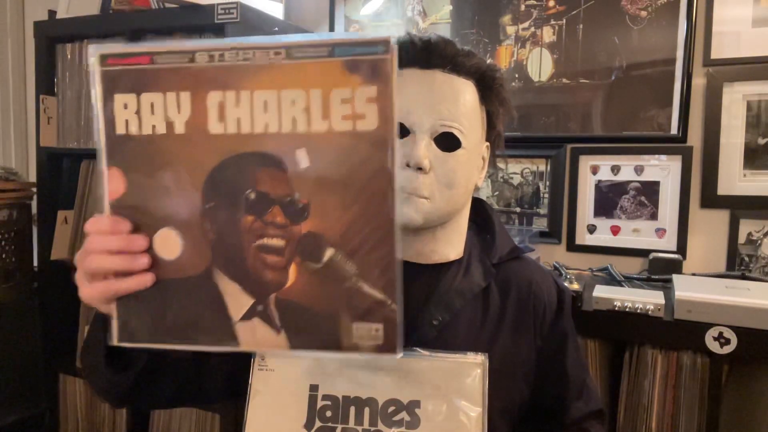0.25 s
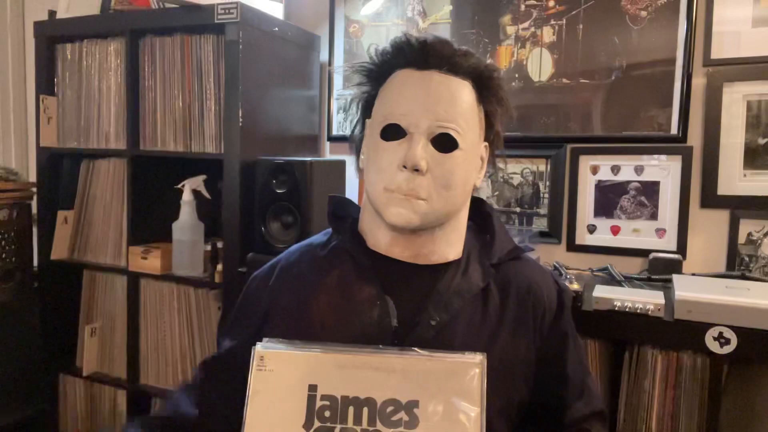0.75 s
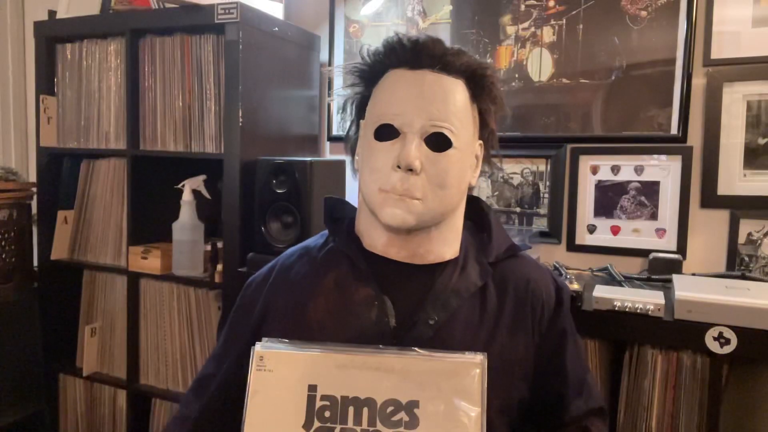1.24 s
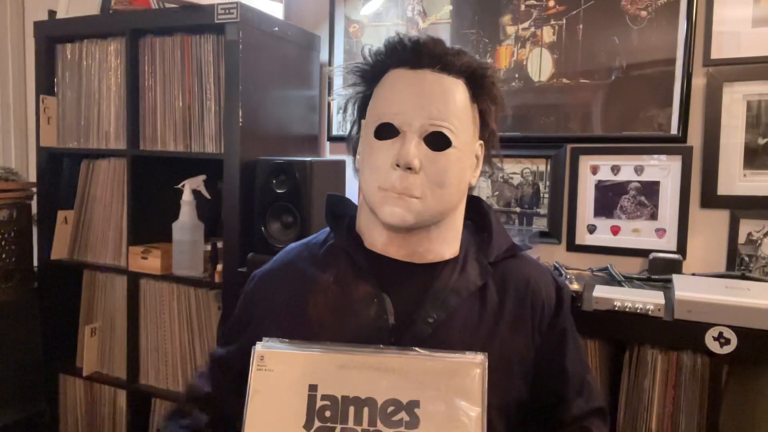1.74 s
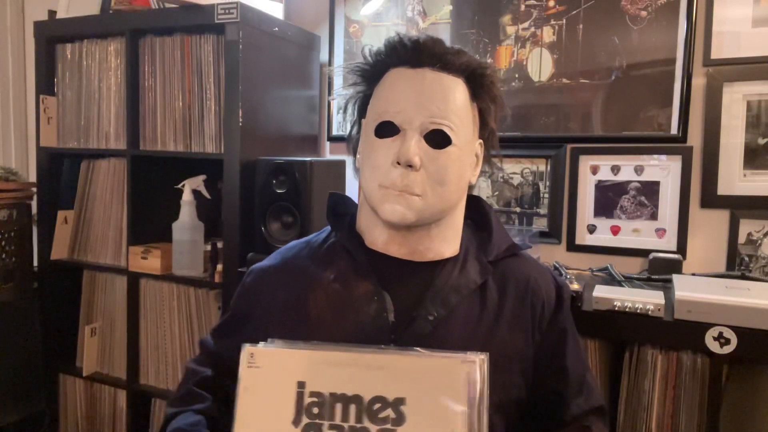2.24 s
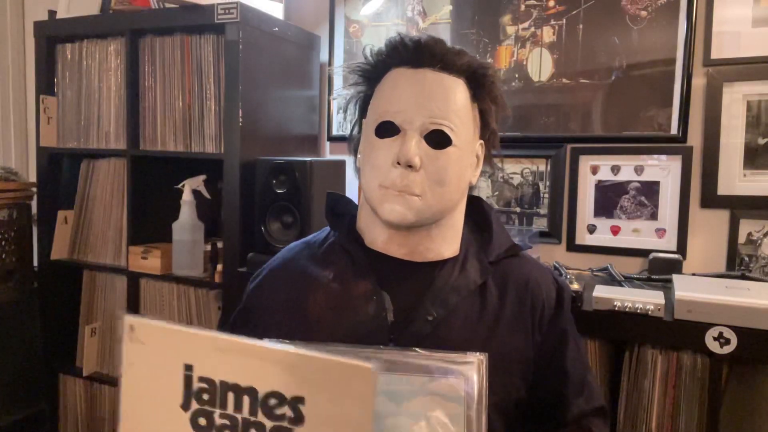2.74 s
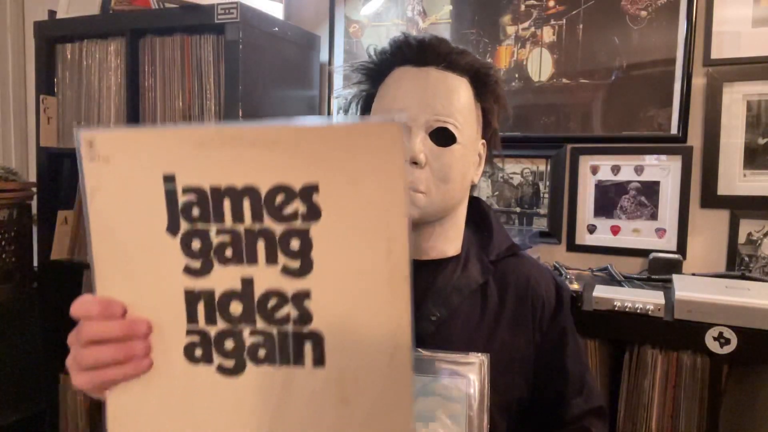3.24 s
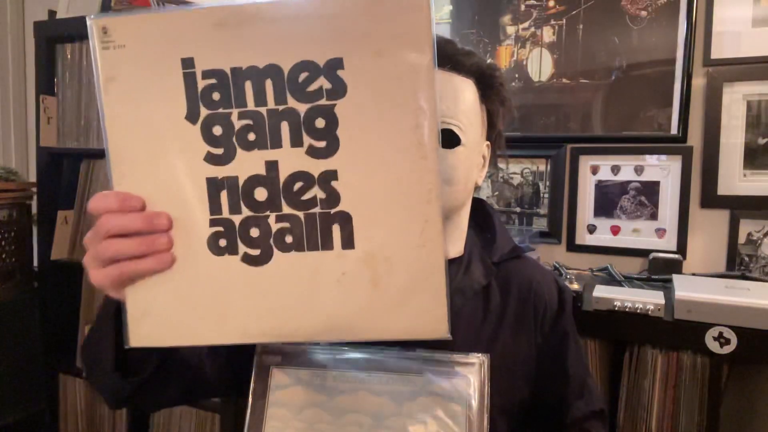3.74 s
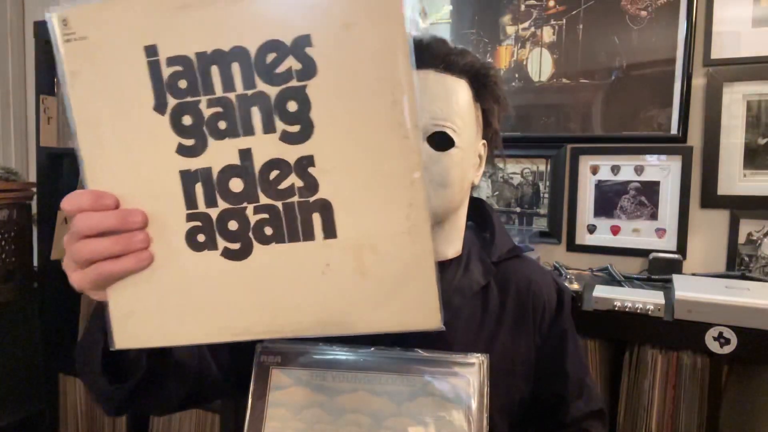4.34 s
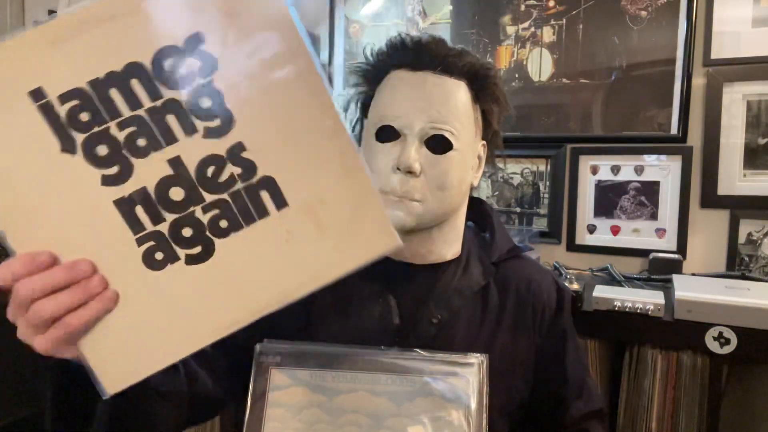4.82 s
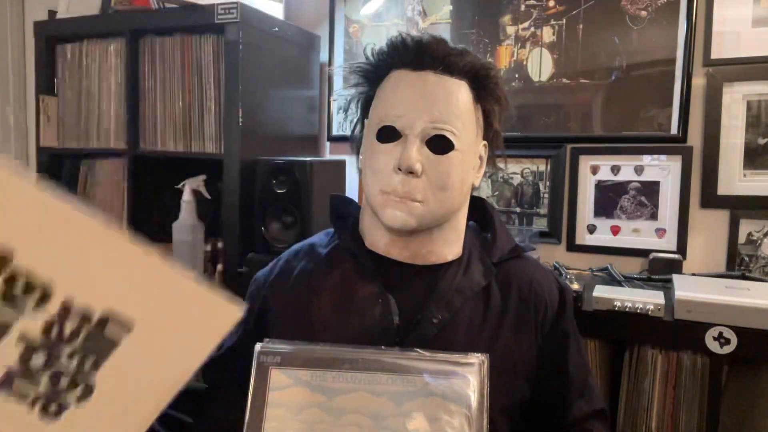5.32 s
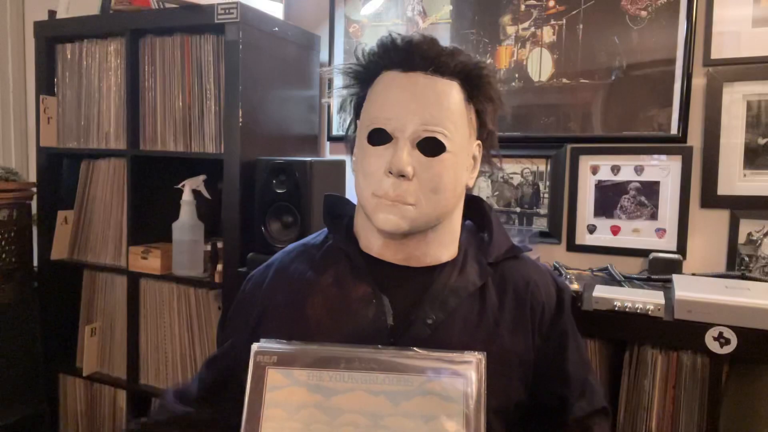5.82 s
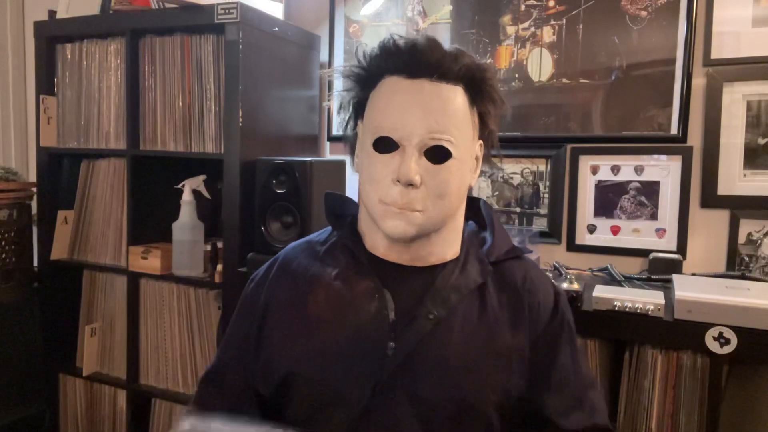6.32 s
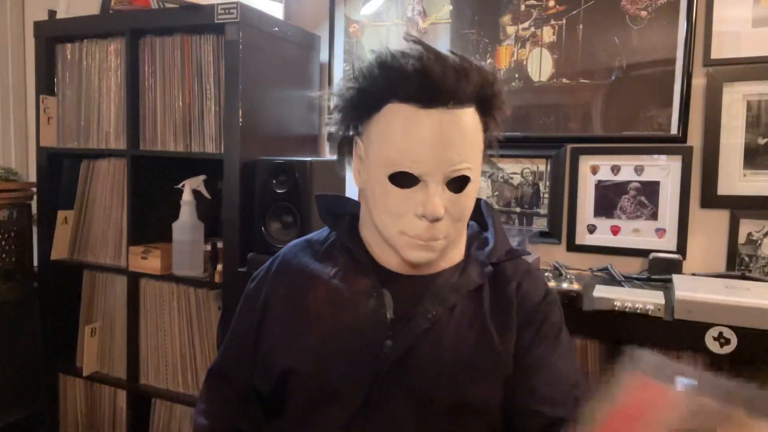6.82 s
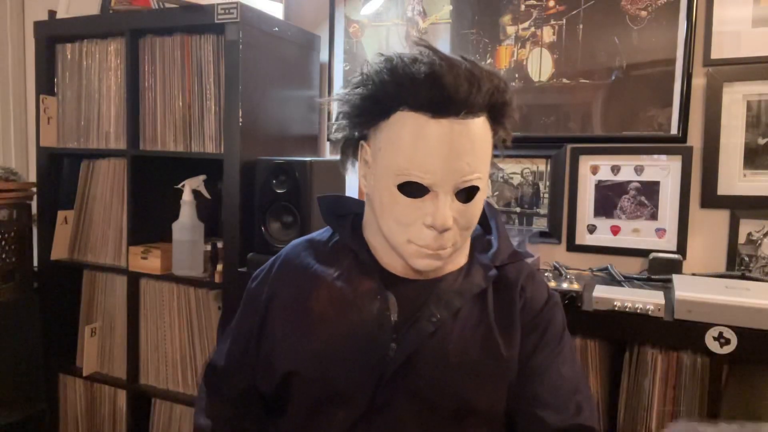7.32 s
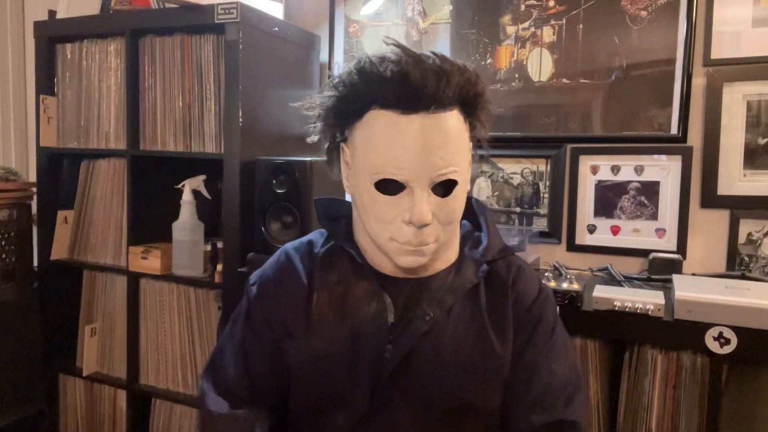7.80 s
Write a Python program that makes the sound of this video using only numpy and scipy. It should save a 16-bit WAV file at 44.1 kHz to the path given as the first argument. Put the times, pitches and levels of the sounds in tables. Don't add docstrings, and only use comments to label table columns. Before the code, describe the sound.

Close up in a small furnished room, hands move card record covers in plastic sleeves. A few faint ticks and a short crinkle come first, then a hard flat slap. Rustling, tiny squeaks and a sharp snap follow, then near quiet with light taps. Later the film crinkles again, a second slap lands, and busy rustling continues over a steady low hum.

```python
import sys
import numpy as np
from scipy import signal
from scipy.fft import rfft, irfft, next_fast_len
from scipy.io import wavfile

SR = 44100
rng = np.random.default_rng(int(sys.argv[2]) if len(sys.argv) > 2 else 0)


def voltage_ratio(decibels):
    exponent = np.asarray(decibels, float) / 20
    return 10 ** exponent


def to_wav(sig):
    pcm = np.clip(np.atleast_2d(sig), -1, 1) * 32767
    pcm = np.round(pcm).astype(np.int16)
    wavfile.write(sys.argv[1], SR, pcm.T)


N = 355446

# start in seconds, film level in dB,
# middle in dB above the film, card in dB above the film, decay time t60 in seconds.
COVER_LANDINGS = [(1.5633, -47, 10, 24, 0.027), (1.5668, -45, 15.5, 26, 0.02), (1.575, -33, 4.5, 10, 0.066),
                  (1.581, -6, -6, -2, 0.016), (1.583, -3, -4, -17, 0.014), (1.587, -20, 9, 12, 0.0076),
                  (1.589, -20.5, -2.5, 3, 0.039), (6.206, -33, 0.5, 20, 0.026),
                  (6.213, -32.5, 9, 17.5, 0.04), (6.233, -28, 9.5, 23, 0.014), (6.237, -6, -7, -9, 0.011),
                  (6.2395, -22.5, 9, 6, 0.052), (6.243, -21.5, 2.5, 6.5, 0.012)]
# frequency in Hz, width in Hz, level in dB.
PILE_MODES = [(180.2, 65, 3), (255, 120, 2.5), (350, 120, 2), (758.3, 130, -1), (1000, 300, -7),
              (1350, 140, -1.5), (1650, 360, -1.5), (2050, 500, -9)]
# frequency in Hz, width in Hz, level in dB.
HIGHER_PILE_MODES = [(94.1, 60, -1.5), (266, 90, 3), (418, 85, 0), (541.7, 70.4, -2), (776, 110, -0.5),
                     (1100, 164, -0.5), (1350, 150, -4), (1990, 270, -3)]
# start in seconds, peak in dB, fold pitch in Hz,
# left over right in dB.
TICKS = [(0.6275, -60, 1310, -2), (1.198, -39.5, 1840, 3), (1.2043, -43.5, 3080, -12),
         (1.3635, -38, 1350, 8), (1.374, -35.5, 3870, -13), (2.1808, -45, 2630, 3),
         (2.4666, -24.5, 2380, -3), (2.475, -40, 4000, 3), (2.7328, -68, 1230, -3.5),
         (2.7936, -55, 2150, 10.5), (3.1984, -60.5, 2140, -5), (3.372, -57, 5100, -5),
         (4.755, -60.5, 3760, 4), (5.7543, -49, 2750, -0.5), (5.7732, -40, 2160, -4.5),
         (6.1264, -38.5, 1340, 9), (6.304, -39.5, 3964, 3), (6.453, -55, 2390, 9.5),
         (6.5364, -43.5, 4760, -10), (6.542, -38.5, 1683, 8), (6.554, -36.5, 1330, -10.5),
         (6.612, -50, 4410, 11), (6.694, -42, 1590, 4), (6.785, -56, 4865, -10), (6.798, -41, 4900, 8),
         (6.8617, -47, 4690, 8), (7.8514, -53, 3187, 2), (7.888, -43.5, 1650, 8), (7.9983, -31, 4760, -0.5)]
# start in seconds, peak in dB, knock in dB more, fold pitch in Hz.
KNOCKS = [(0.6632, -49, 8.5, 6900), (1.1344, -65, 10, 1256), (2.1056, -61, 17, 1960),
          (2.1145, -30.5, 4, 1970), (2.2313, -46, 4, 2480), (2.3938, -58.5, 18.5, 2016),
          (2.4577, -53, 3.5, 2600), (2.7164, -61.5, 6, 2427), (3.441, -60, 11, 4541),
          (4.3994, -70, 20.5, 1882), (4.8307, -58.5, 18.5, 4030), (5.3654, -61.5, 8, 5460),
          (5.812, -43, -3.5, 3070), (5.8628, -42, -3.5, 2450), (5.9274, -58, -8, 1210),
          (6.4144, -49.5, -4, 1256), (6.4653, -72, 13.5, 2549), (6.5643, -41, 3.5, 1920),
          (6.688, -42, 7.5, 1160), (6.7429, -39.5, 4, 1430), (6.8452, -43, 1.5, 1824),
          (6.8805, -46, 4, 3890), (7.1514, -84.5, 20, 4120), (7.208, -77, 15.5, 3786),
          (7.226, -74, 24.5, 1410), (7.3114, -73.5, 20, 2356), (7.7025, -57.5, 8.5, 3034),
          (7.878, -47.5, 4, 1686), (7.9902, -46.5, 8, 4550)]
# start in seconds, peak in dB, knock in dB more,
# fold pitch in Hz.
TAPS = [(1.8208, -46.5, 2, 1403), (2.383, -53, 0.5, 2785), (2.5475, -58, 10, 2200), (2.7455, -80, 22, 2040),
        (2.8033, -58, 4, 2083), (2.8893, -65, 19, 2450), (2.9734, -49, 7, 2200), (4.867, -75, 7.5, 1712),
        (4.9754, -69, 18, 2297), (5.389, -63, 2.5, 2130), (6.6634, -46, -1, 4590),
        (7.9369, -54, -1.5, 1631)]
# start in seconds, peak in dB, knock in dB more,
# fold pitch in Hz.
FLICKS = [(0.663, -66, 16, 1500), (0.6687, -67, 3, 6400), (1.3668, -39.5, 0, 6100), (1.8165, -70, 14, 897),
          (6.4, -62, 0.5, 1500), (6.464, -55.5, 5, 4500), (6.569, -46, 0, 4004), (6.8, -50, 1, 4590),
          (7.196, -82, 20, 3800), (7.24, -77, -6, 3000), (7.505, -69.5, 10, 1000), (2.122, -41, -15, 2600),
          (2.607, -71, 12, 2200), (2.649, -65, 13, 1490), (4.8375, -72, 10, 2500), (4.842, -70, 1, 5200),
          (4.865, -80.5, 20, 1725), (4.877, -80, 3, 1500), (4.893, -78, 8, 1600), (5.79, -66, 7.5, 2000),
          (5.872, -58.5, 5.5, 3100), (5.914, -67, 8, 2094), (5.938, -58, 10, 3570),
          (5.954, -61.5, 20.5, 1100), (6.1304, -39, -7.5, 1880), (6.137, -46, -8.5, 6426),
          (7.7068, -58, 10, 3036), (7.872, -56, -5, 2980), (7.98, -45, -2, 2500), (8.002, -37, -3, 3000),
          (8.005, -44, 0, 4900), (8.057, -49, 6, 3980), (0.663, -64, 18, 6500), (0.663, -65, 17, 4940),
          (5.366, -80, 13, 5700), (4.832, -66, 17, 1500), (6.688, -59, 15, 1110), (6.664, -48, 7, 4380),
          (2.386, -46, -8, 3000), (2.793, -66, 13.5, 1600), (5.95, -68, 2, 1500)]
# start in seconds, peak in dB, knock in dB
# more, fold pitch in Hz.
SPECKS = [(6.454, -70, 11, 2500), (6.486, -77, 16, 1500), (2.986, -77, 12, 6400), (2.926, -75, -6, 6500),
          (4.749, -72, -10, 5000), (4.982, -72, -8, 3000), (2.7225, -78, 12, 1200), (2.511, -70, 14, 3900),
          (2.5895, -74, 14, 2200), (6.655, -66, 15, 4400), (5.838, -70, 14, 2600), (2.317, -68, 14, 3200),
          (2.111, -58, 14, 1500), (1.118, -82, 14, 1500), (4.942, -84, 14, 1700), (7.155, -82, 18, 2200),
          (7.272, -86, 15, 3300), (7.49, -84, 16, 1100), (7.517, -84, 16, 1100), (7.541, -85, 15, 1900),
          (7.938, -72, 10, 4500), (6.687, -56, 17, 1000), (5.8125, -64, 16, 4200), (5.935, -70, 16, 1700)]
# frequency in Hz, density in dB per Hz.
FILM_COLOUR = [(120, -51.5), (200, 5), (411, -3.5), (640, -8.5), (702, -8.5), (1220, -7.5), (1550, -3),
               (2560, -2), (6430, -7), (7320, -8), (11000, -8), (14500, -12), (15600, -18), (16600, -35)]
# start in seconds, length in seconds, rasp level in dB,
# sheen in dB more.
SCUFFS = [
    (0.668, .075, -66, -12),
    (1.138, .045, -68, -14),
    (1.366, .2, -61, 3),
    (1.816, .06, -55, -3),
    (2.478, .07, -64, 4),
    (4.836, .08, -68.5, -12),
    (5.812, .04, -61, 4),
    (6.79, .03, -61, 6),
    (7.152, .12, -77, -18),
]
# start, fullest point and end in seconds, rasp level in dB, sheen in dB more.
SLIDES = [(1.19, 1.21, 1.24, -63, 0), (1.25, 1.285, 1.303, -66.5, 1), (1.29, 1.34, 1.35, -63.5, 2.5),
          (1.38, 1.41, 1.26, -88, 0), (1.86, 1.9, 1.94, -76, -1), (1.965, 1.988, 2.003, -68.5, 11),
          (2.04, 2.09, 2.07, -80.5, 4), (2.12, 2.26, 2.36, -62, 6), (2.3, 2.38, 2.486, -62.5, 6),
          (2.5, 2.57, 2.66, -68, 6.5), (5.735, 5.75, 5.84, -74, 8.5), (5.77, 5.8, 5.7, -66, 0),
          (5.84, 5.88, 5.93, -69.5, 1), (5.88, 5.96, 5.95, -63, 3), (5.96, 6.03, 6.04, -69, 5.5),
          (6.04, 6.1, 6.2, -71.5, 1), (6.122, 6.135, 6.185, -63, 9), (6.15, 6.195, 6.3, -62, -12),
          (6.33, 6.4, 6.6, -78, -7), (6.55, 6.6, 6.84, -68, -3), (6.61, 6.655, 6.7, -63, -3),
          (6.66, 6.72, 6.79, -61, -5), (6.81, 6.878, 6.905, -63, -7), (7.26, 7.365, 7.392, -73, 0),
          (7.47, 7.59, 7.72, -77, 3), (7.692, 7.705, 7.76, -62.5, -2), (7.73, 7.785, 7.8, -60.5, 1),
          (7.83, 7.885, 7.87, -63, -3), (7.92, 7.998, 8.03, -57, -5.5), (8.025, 8.058, 8.3, -57, 0.5)]
# start, fullest point and end in seconds, card body level in dB,
# low drag in dB more.
DRAGS = [(1.19, 1.21, 1.28, -72, -27), (1.37, 1.41, 1.56, -76, 20), (1.825, 1.832, 1.896, -66.5, -1),
         (1.95, 1.984, 2.03, -76, -7.5), (2.17, 2.255, 2.38, -68.5, -8), (2.375, 2.391, 2.1, -68, -5),
         (2.47, 2.48, 2.45, -75, 6), (2.53, 2.56, 2.74, -85, 6), (4.832, 4.836, 4.96, -72, -29),
         (5.78, 5.818, 5.83, -60.5, -3.5), (5.87, 5.94, 6.1, -66, -3.5), (6.08, 6.125, 6.17, -67, 2),
         (6.34, 6.394, 6.547, -73, -14), (6.55, 6.58, 6.85, -69, 0), (6.62, 6.7, 6.79, -58, -20),
         (6.82, 6.88, 6.93, -71, -3), (7.14, 7.2, 7.27, -74, -20), (7.3, 7.366, 7.43, -76, -9),
         (7.47, 7.51, 7.62, -75, -20), (7.7, 7.76, 7.84, -67, -21.5), (7.92, 7.97, 8.15, -68, -18)]
# start in seconds, length in seconds, first pitch in Hz,
# last pitch in Hz, level in dB.
SQUEAKS = [
    (2.231, .013, 2300, 2750, -53),
    (2.279, .011, 3700, 3750, -60),
    (2.36, .011, 4400, 4250, -57),
    (2.358, .03, 3100, 2400, -62),
    (6.562, .013, 1900, 1850, -49),
]
# start and end in seconds, pitch in Hz, width in Hz,
# level in dB.
STRIPS = [(1.364, 1.5, 218, 60, -61), (2.12, 2.171, 2430, 500, -64.5), (2.465, 2.528, 11300, 900, -60.5),
          (5.783, 5.849, 4238, 900, -66), (6.02, 6.125, 2150, 350, -72), (7.696, 7.721, 2915, 500, -61.5),
          (7.732, 7.772, 2200, 500.7, -60), (7.78, 7.847, 2660, 350, -64), (8.003, 8.024, 4770, 500, -68),
          (1.818, 1.877, 6420, 703, -70), (1.124, 1.175, 6200, 900, -73), (6.625, 6.669, 4390, 900, -58),
          (7.15, 7.257, 3600, 1507, -81)]
# frequency in Hz, phase in radians.
PILE_PORTS = [(0, 0), (1900, 1.4), (3000, 2.0), (3700, 4.5), (6400, 4.4), (7700, 3.8), (11200, 6.0),
              (14200, 6.8), (16000, 8.6)]
# frequency in Hz, phase in radians.
HAND_PORTS = [(0, 0), (2500, -.6), (4500, -1.6), (6600, -2.1), (7600, -2.9), (11200, -.1), (14200, .1),
              (16000, 2.4)]
# frequency in Hz, decay time t60 in seconds.
ROOM_DECAY = [(200, .19), (1000, .18), (4000, .19), (12000, .15)]
# frequency in Hz, level in dB, left over right in dB.
HUM_LINES = [(21.5, -67, -1.8), (69, -59, -0.74), (119.6, -63, -1.5), (242, -77.5, -7), (360.4, -80, -6),
             (484, -89.5, -3.5), (596, -88, -4)]
# frequency in Hz, width in Hz, level in dB.
RUMBLE_BANDS = [(70, 9, -68), (120, 12, -70)]
# frequency in Hz, density in dB per Hz.
AIR_COLOUR = [(25, -30), (42, -8), (71, -4), (129, -6), (170, -14), (310, -25), (540, -34.5), (1200, -47.5),
              (4280, -52), (7230, -57), (13600, -56), (16500, -79)]
# frequency in Hz, likeness from -1 to 1.
AIR_LIKENESS = [(60, 1), (130, -0.39), (250, 0.19), (500, .1), (2000, 1), (7000, -0.47), (10000, 0.41),
                (14000, 0.28)]

SECOND_COVER_S = 4
EASE_DB, EASE_BEND = 12.5, 1.4


def rms_one(x):
    return x / np.sqrt(np.mean(x ** 2) + 1e-20)


def at_hz(points, hz):
    table_hz, values = np.transpose(points)
    return np.interp(np.log(np.maximum(hz, 1)), np.log(table_hz), values)


def coloured(x, gain_of_hz):
    size = next_fast_len(x.shape[-1] + 4096)
    hz = np.arange(size // 2 + 1) * SR / size
    return irfft(rfft(x, size) * gain_of_hz(hz), size)[..., :x.shape[-1]]


def band(x, low_hz, high_hz):
    edges = [low_hz, min(high_hz, .45 * SR)]
    return signal.sosfilt(signal.butter(2, edges, "band", fs=SR, output="sos"), x)


def resonance(x, hz, width_hz):
    r = np.exp(-np.pi * width_hz / SR)
    feedback = [1, -2 * r * np.cos(2 * np.pi * hz / SR), r * r]
    return signal.lfilter(np.array([1, 0, -1]) * (1 - r * r) / 2, feedback, x)


def drift(rate):
    knots = rng.standard_normal(int(N / SR * 200) + 2)
    return np.interp(np.arange(N) / SR * min(rate, 199), np.arange(len(knots)), knots)


def panned(x, db):
    return np.array([x * voltage_ratio(db / 2), x * voltage_ratio(-db / 2)])


def puff(noise, t60, tick_share):
    t = np.arange(len(noise)) / SR
    decay = voltage_ratio(-60 * t / max(t60, .002))
    tick = np.arange(len(t)) == 14
    return noise * decay * np.minimum(t / 0.00033, 1) + tick_share * tick


def slaps(tick_share):
    blows = np.zeros((4, N))
    noise = rng.standard_normal((len(COVER_LANDINGS), 4, 8192))
    for (s, peak_db, mid_db, card_db, t60), draws in zip(COVER_LANDINGS, noise):
        at = round(s * SR)
        push_db = (-3 if s > SECOND_COVER_S else -11) + 0.21 * card_db
        parts = ((0, 1), (mid_db, 1.3), (card_db, 1.6), (push_db, 2.5))   # dB, times longer
        for k, (db, lasts) in enumerate(parts):
            blows[k, at:at + draws.shape[1]] += voltage_ratio(peak_db + db) * puff(draws[k], lasts * t60, tick_share)
    film = band(blows[0], 6000, 13000) + voltage_ratio(2) * band(blows[1], 900, 6000)
    card = []
    for hits, modes in zip(np.split(blows[2], [SECOND_COVER_S * SR]), (PILE_MODES, HIGHER_PILE_MODES)):
        card.append(sum((-1) ** k * voltage_ratio(db) * resonance(hits, hz, width)
                        for k, (hz, width, db) in enumerate(modes)))
    card = np.concatenate(card)
    air_push = band(blows[3], 64, 300)
    wide = sum(voltage_ratio(db) * resonance(blows[3], hz, width) for hz, width, db in PILE_MODES[1:5])
    centre = film + voltage_ratio(8.5) * card + voltage_ratio(13) * air_push
    return panned(centre, -0.99) + voltage_ratio(5) * wide * [[1], [-1]]


def snaps(rows):
    t60, tick_share = 0.0043, 0.93
    out = np.zeros((2, N))
    noise = rng.standard_normal((len(rows), 3, 2048))
    for (s, peak_db, mid_db, hz, low_db, pan_db), (bright, middle, dull) in zip(rows, noise):
        top_hz = np.clip(12134 - 221.5 * mid_db, 7000, 16000)
        tick = band(puff(bright, t60, tick_share), 6400, top_hz)
        middle = puff(middle, 3.5 * t60, tick_share)
        pitched = resonance(middle, hz, hz / 4.5)
        unpitched = 0.29 * voltage_ratio(-0.4 * max(mid_db, 0)) * band(middle, 820, np.clip(2.4 * hz, 3600, 9200))
        knock = band(pitched + unpitched, 600, 11000)
        push = band(puff(dull, 9.8 * t60, tick_share), 340, 1800)
        sound = voltage_ratio(8.5) * tick + voltage_ratio(8.0 + mid_db) * knock + voltage_ratio(14.0 + low_db) * push
        at = round(s * SR)
        out[:, at:at + len(sound)] += panned(voltage_ratio(peak_db) * sound, np.clip(pan_db, -8, 8))[:, :N - at]
    return out


def crease_rows():
    rows = [(s, db, -9.5, hz, -30, pan) for s, db, hz, pan in TICKS]
    for table, dull_db in ((KNOCKS, -18), (TAPS, -9)):
        pans = -7.5 + 14.5 * rng.standard_normal(len(table))
        rows += [(s, db, knock, hz, knock + dull_db, pan) for (s, db, knock, hz), pan in zip(table, pans)]
    return rows


def small_rows(table):
    return [(s, db, knock, hz, knock - 24, -2.5) for s, db, knock, hz in table]


def crinkle(grains_per_s, grain_db, cycles):
    happens = rng.random(N) < grains_per_s * voltage_ratio(6 * drift(15)) / SR
    pops = happens * rng.choice([-1, 1], N)
    pops = pops * voltage_ratio(grain_db * np.minimum(rng.exponential(1, N), 3.0)) + 1e-18
    folds_hz = np.geomspace(1000, 6500, 14)
    dealt = rng.integers(0, 14, N)
    ringing = sum(resonance(pops * (dealt == k), hz, hz / cycles) for k, hz in enumerate(folds_hz))
    return rms_one(band(ringing, 650, 9100))


def strokes(rows, voice, second_voice, rise_db, fall_db):
    out = np.zeros(N)
    for start, fullest, end, db, more_db in rows:
        span = slice(round((start - .006) * SR), min(N, round((end + .02) * SR)))
        t = np.arange(span.start, span.stop) / SR
        rise = rise_db * np.abs((fullest - t) / max(fullest - start, .002)) ** EASE_BEND
        fall = fall_db * np.abs((t - fullest) / max(end - fullest, .002)) ** EASE_BEND
        drop_db = np.where(t < fullest, rise, fall)
        fade = np.clip(np.minimum((t - start) / .006 + 1, (end - t) / .02 + 1), 0, 1)
        out[span] += fade * voltage_ratio(db - drop_db) * (voice[span] + voltage_ratio(more_db) * second_voice[span])
    return out


def rustle(grains_per_s, grain_db, grain_share, flicker_db, crinkle_db):
    registers = []
    for low_hz, high_hz, spread in ((6500, 16000, .95), (1500, 7200, .72), (490, 1300, .9)):
        slips = (rng.random(N) < grains_per_s / SR) * voltage_ratio(grain_db * np.minimum(rng.exponential(1, N), 3))
        slips = rms_one(signal.lfilter([1], [1, -.96], slips))
        hiss = rng.standard_normal(N) * (1 + grain_share * np.sqrt(1300 / low_hz) * slips)
        hiss = band(coloured(hiss, lambda hz: voltage_ratio(at_hz(FILM_COLOUR, hz))), low_hz, high_hz)
        registers.append(rms_one(hiss) * voltage_ratio(flicker_db * drift(35)) / spread)
    sheen, rasp, card = registers
    rasp = 0.5 * rasp + voltage_ratio(crinkle_db) * crinkle(grains_per_s=700., grain_db=5.5, cycles=6.0)
    rasp = rasp + voltage_ratio(-14) * card
    drag = rms_one(band(band(rng.standard_normal(N), 260, 560), 310, 520)) * voltage_ratio(1.5 * drift(40))

    attack_s = 0.0061
    scuffs = [(s, s + attack_s, s + length, db, more) for s, length, db, more in SCUFFS]
    film = strokes(scuffs, rasp, sheen, 13.0, 24.5) + strokes(SLIDES, rasp, sheen, EASE_DB, EASE_DB)
    body = strokes(DRAGS, card, drag, EASE_DB, EASE_DB)
    far_rasp, far_card, far_drag = [np.roll(voice, SR) for voice in (rasp, card, drag)]
    side = band(strokes(SLIDES, far_rasp, far_rasp, EASE_DB, EASE_DB), 500, 2500)
    side = side + strokes(DRAGS, far_card, far_drag, EASE_DB, EASE_DB)
    return panned(film, -2.5) + panned(body, -4.0) + voltage_ratio(-4) * side * [[1], [-1]]


def patchy(pair, patch_db, per_s):
    edges = 1200 * 2 ** np.arange(0, 3.8, 1 / 3)
    out = pair.copy()
    for low, high in zip(edges, edges[1:]):
        wander = drift(per_s) + 0.24 * drift(3.4 * per_s)
        gain = voltage_ratio(patch_db * wander - patch_db ** 2 / 9)
        out += (gain - 1) * resonance(pair, np.sqrt(low * high), 0.7 * (high - low))
    return out


def squeaks(rough):
    out = np.zeros(N)
    for s, length, start_hz, end_hz, db in SQUEAKS:
        t = np.arange(round(length * SR)) / SR
        tone = np.sin(2 * np.pi * (start_hz * t + (end_hz - start_hz) * t ** 2 / (2 * length)))
        out[round(s * SR):][:len(t)] += voltage_ratio(db) * np.sin(np.pi * t / length) * tone
    return panned(out * (1 + rough * drift(203.4)), -1.5)


def strips():
    out = np.zeros(N)
    for (start, end, hz, width, db), noise in zip(STRIPS, rng.standard_normal((len(STRIPS), 8192))):
        t = np.arange(round((end - start) * SR))
        swell = np.sqrt(np.sin(np.pi * t / len(t)))
        singing = rms_one(resonance(resonance(noise, hz, width), hz, 2 * width))
        out[round(start * SR):][:len(t)] += voltage_ratio(db) * swell * singing[-len(t):]
    return panned(out, -2.0)


def delayed(pair, ports):
    right = coloured(pair[1], lambda hz: np.exp(-1j * np.interp(hz, *np.transpose(ports))))
    return np.array([pair[0], right])


def room(x):
    t = np.arange(round(.45 * SR)) / SR
    edges = 30 * 2 ** np.arange(0, 9.4, .5)
    white = rng.standard_normal((2, 2, len(t)))
    tail = 0
    for k, (low, high) in enumerate(zip(edges, edges[1:])):
        t60 = at_hz(ROOM_DECAY, np.sqrt(low * high))
        tail = tail + band(white[k % 2], low, high) * voltage_ratio(-60 * t / t60)
    mid, side = tail * np.clip((t - .002) / 0.0063, 0, 1)
    side = signal.sosfilt(signal.butter(1, 70, "high", fs=SR, output="sos"), side)
    echo = np.array([mid + side, mid - side]) / np.sqrt(np.sum(mid ** 2 + side ** 2))
    return signal.fftconvolve(x.mean(axis=0)[None], echo, axes=1)[:, :N]


def appliance():
    t = np.arange(N) / SR
    lines = 0
    for hz, db, pan_db in HUM_LINES:
        tone = np.sin(2 * np.pi * (hz * t + rng.random()))
        lines = lines + panned(voltage_ratio(db + 2.0 + 0.29 * drift(3.2)) * tone, pan_db)
    booms = 0
    for hz, width, db in RUMBLE_BANDS:
        white = rng.standard_normal(N + SR)
        booms = booms + voltage_ratio(db) * rms_one(resonance(resonance(white, hz, width), hz, 1.9 * width)[SR:])
    return lines + panned(booms, -1.0)


def still_air():
    def alike(hz):
        return np.clip(at_hz(AIR_LIKENESS, hz), -.9, .99)
    mid, side = rng.standard_normal((2, N))
    mid = coloured(mid, lambda hz: voltage_ratio(at_hz(AIR_COLOUR, hz)) * np.sqrt(1 + alike(hz)))
    side = coloured(side, lambda hz: voltage_ratio(at_hz(AIR_COLOUR, hz)) * np.sqrt(1 - alike(hz)))
    air = voltage_ratio([[-58.9], [-58.1]]) * rms_one(np.array([mid + side, mid - side]))
    air[0] -= .35 * resonance(air[0], 220, 500)
    return air


def scene():
    pile = slaps(tick_share=4.6)
    creases = snaps(crease_rows()) + snaps(small_rows(FLICKS))
    specks = snaps(small_rows(SPECKS))
    hands = rustle(grains_per_s=380., grain_db=8.0, grain_share=0.4, flicker_db=3.5, crinkle_db=-2.5)
    hands = patchy(hands + squeaks(rough=0.18), patch_db=3.2, per_s=22.0) + strips()
    near = delayed(hands + creases + specks, HAND_PORTS) + delayed(pile, PILE_PORTS)
    echoes = room(voltage_ratio(-6.0) * hands + voltage_ratio(-12.0) * creases + voltage_ratio(-12) * pile)
    return near + echoes + appliance() + still_air()


def roll_off(x):
    return signal.sosfilt(signal.butter(12, 16970, fs=SR, output="sos"), x)


def record(dry):
    rounded = .95 * np.tanh(dry / .95)
    dipped = rounded - .6 * resonance(dry, 7500, 800)
    cut = signal.sosfilt(signal.cheby2(10, 60, 16950, fs=SR, output="sos"), dipped)
    return roll_off(cut)


dry = scene()
out = record(dry)
to_wav(out)
```